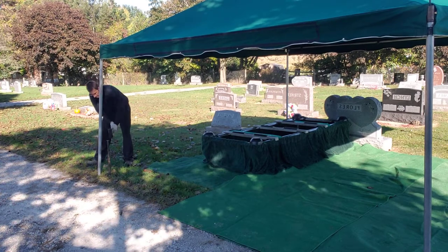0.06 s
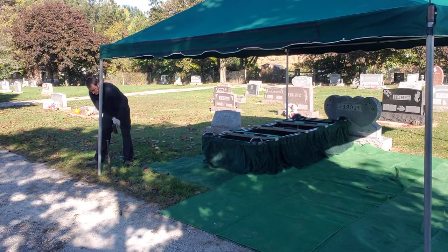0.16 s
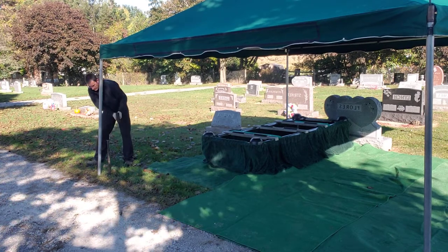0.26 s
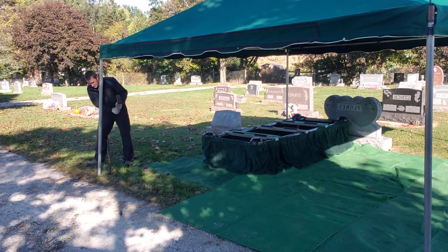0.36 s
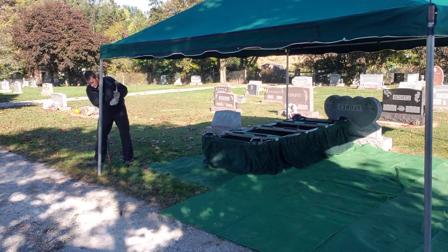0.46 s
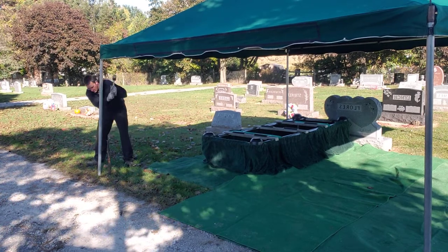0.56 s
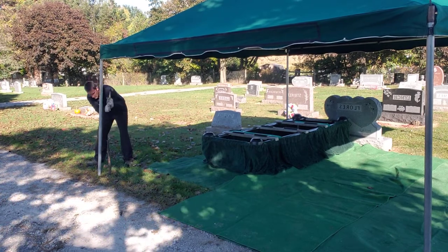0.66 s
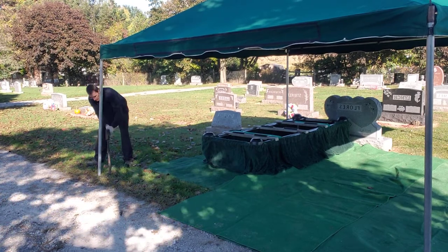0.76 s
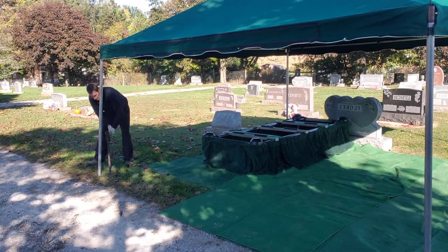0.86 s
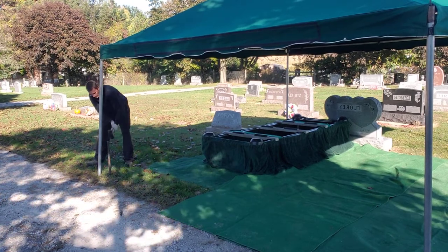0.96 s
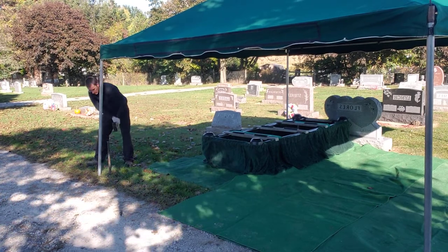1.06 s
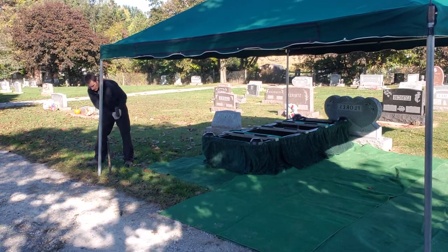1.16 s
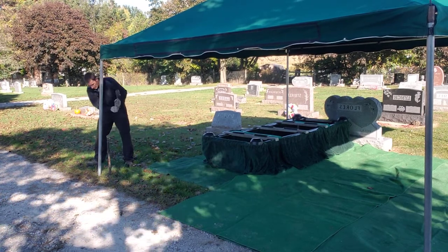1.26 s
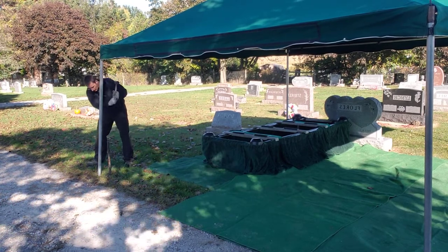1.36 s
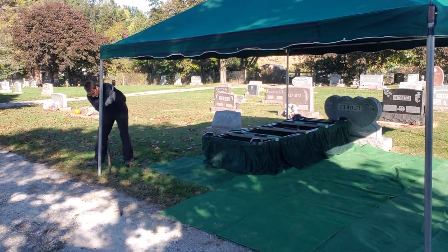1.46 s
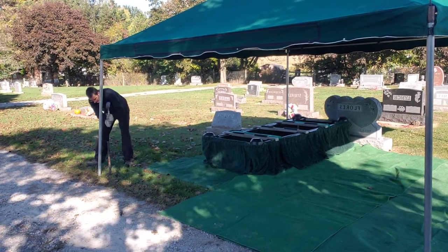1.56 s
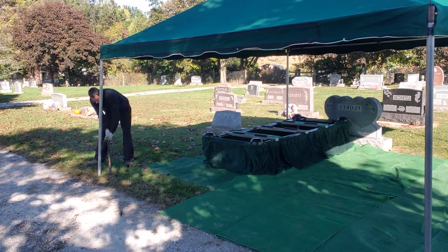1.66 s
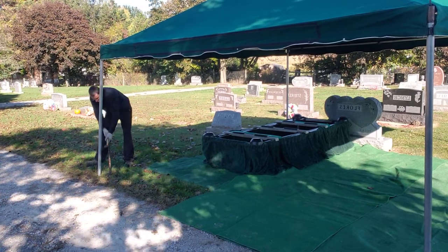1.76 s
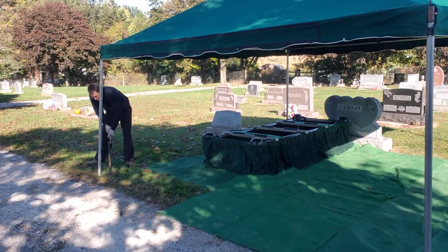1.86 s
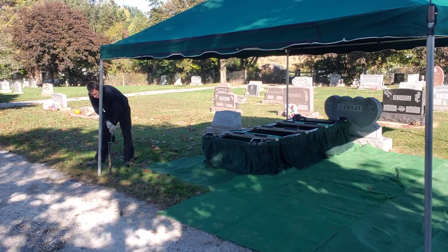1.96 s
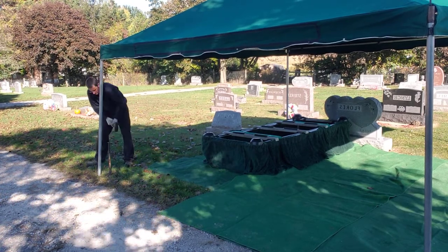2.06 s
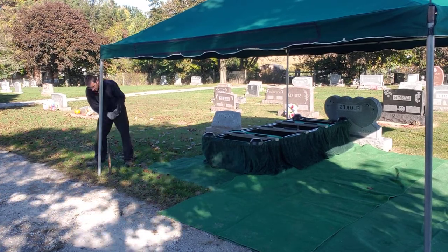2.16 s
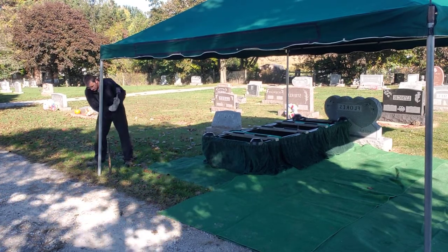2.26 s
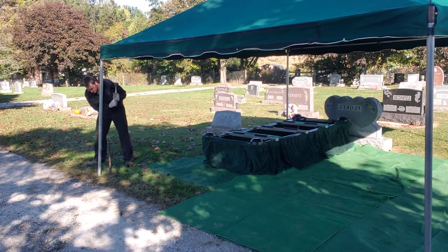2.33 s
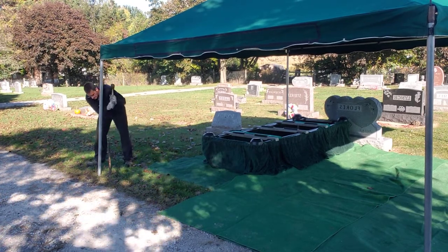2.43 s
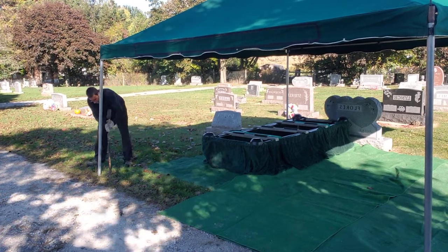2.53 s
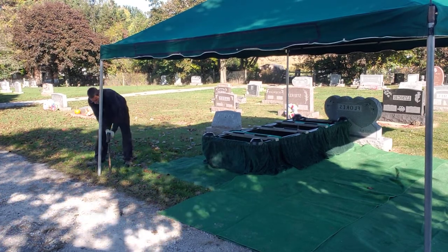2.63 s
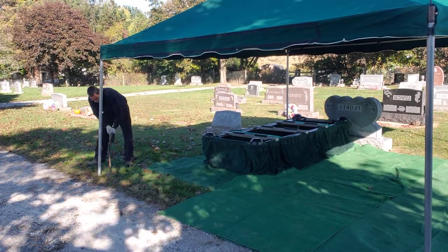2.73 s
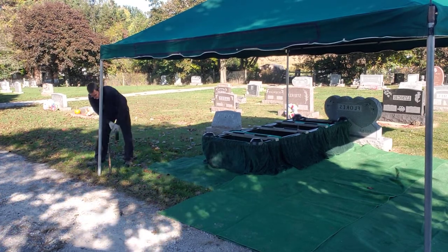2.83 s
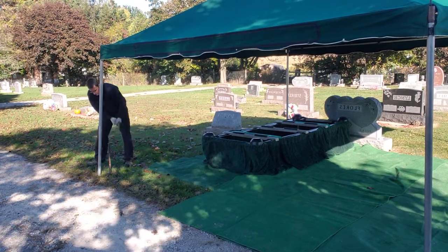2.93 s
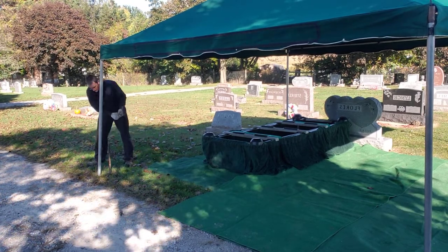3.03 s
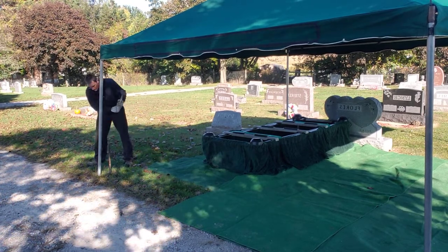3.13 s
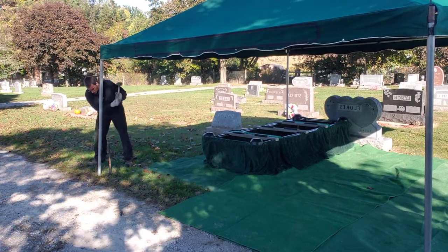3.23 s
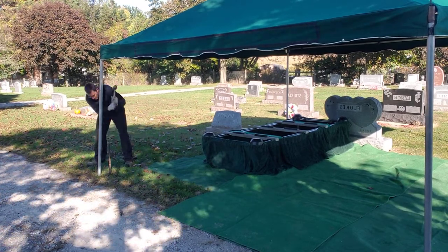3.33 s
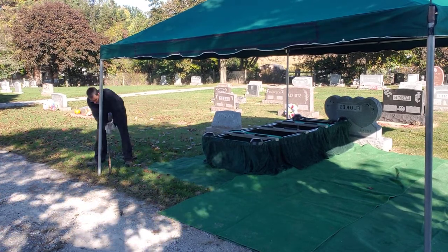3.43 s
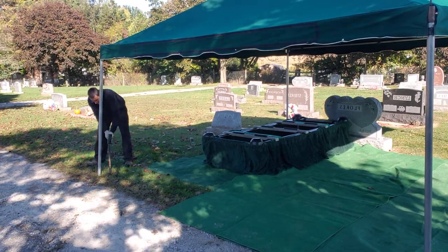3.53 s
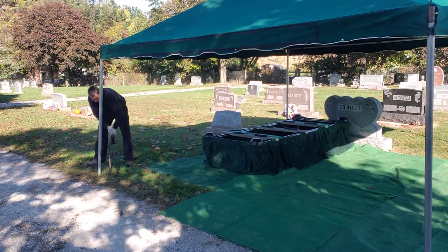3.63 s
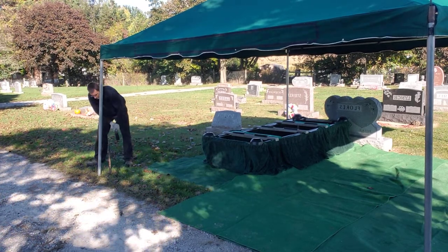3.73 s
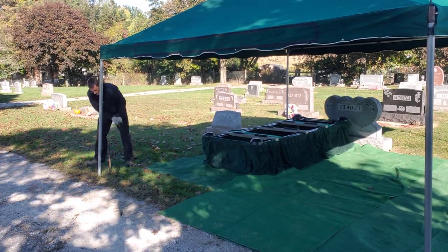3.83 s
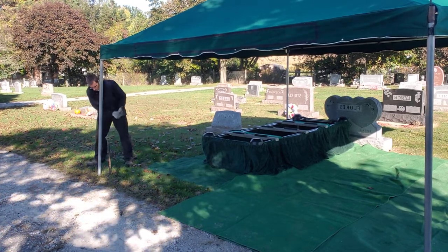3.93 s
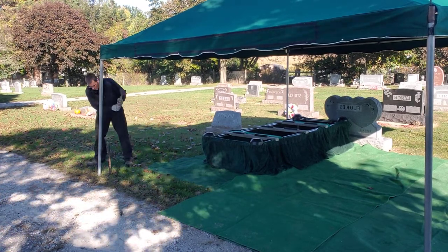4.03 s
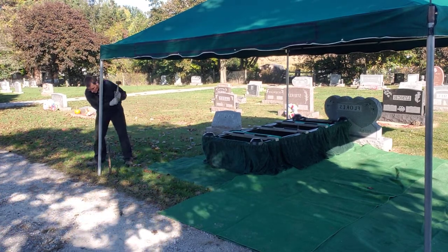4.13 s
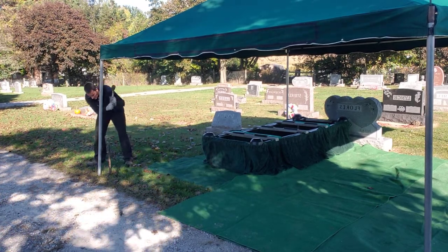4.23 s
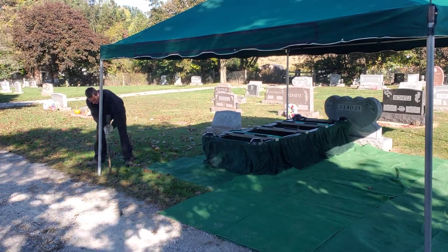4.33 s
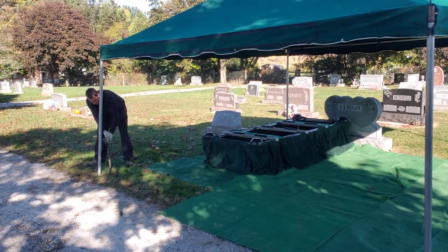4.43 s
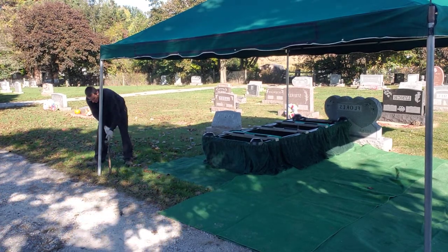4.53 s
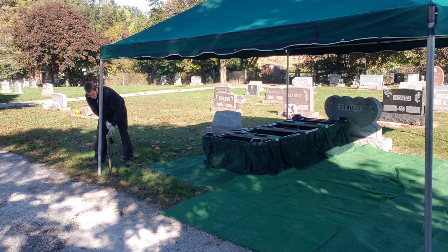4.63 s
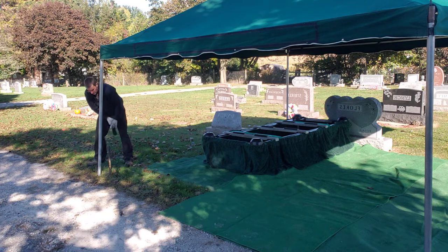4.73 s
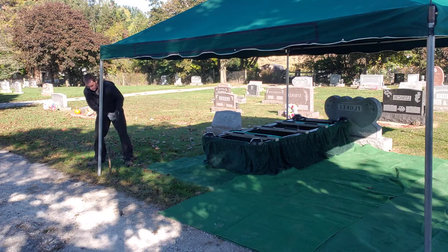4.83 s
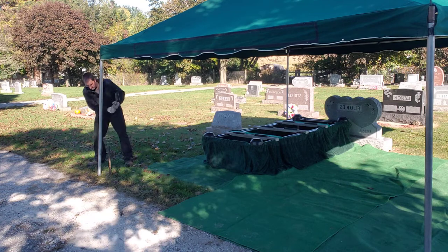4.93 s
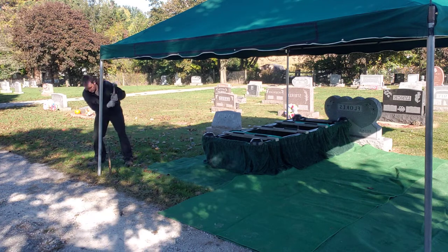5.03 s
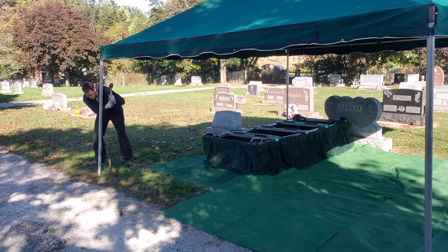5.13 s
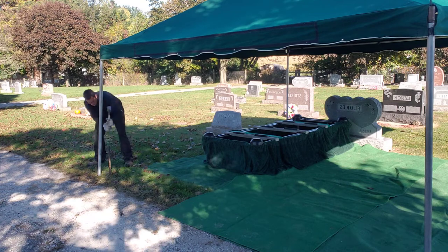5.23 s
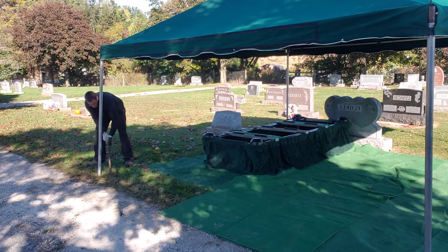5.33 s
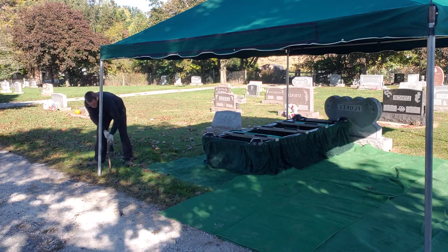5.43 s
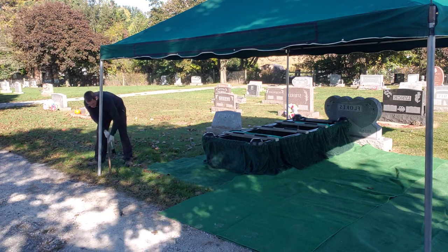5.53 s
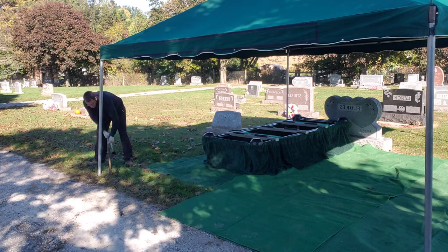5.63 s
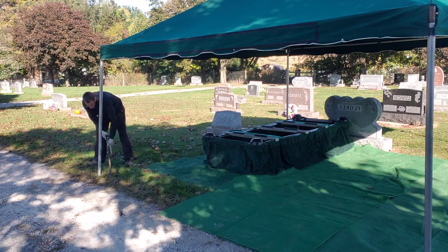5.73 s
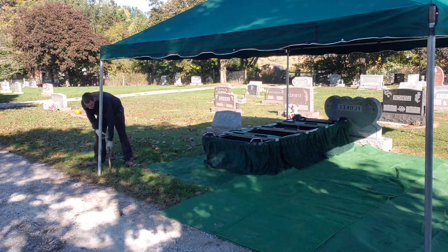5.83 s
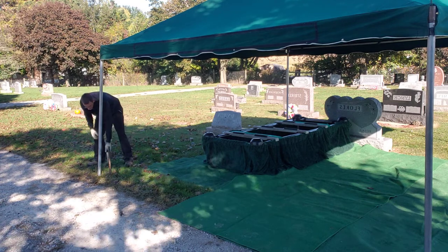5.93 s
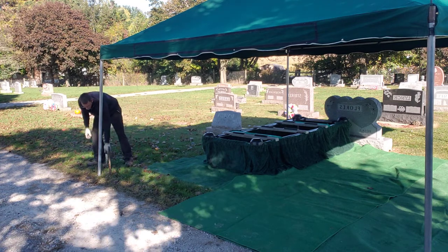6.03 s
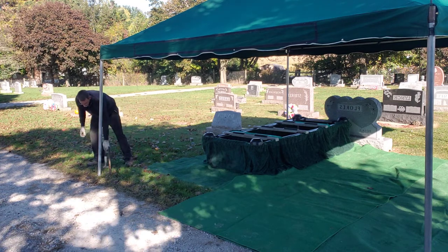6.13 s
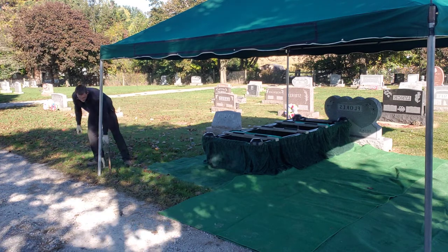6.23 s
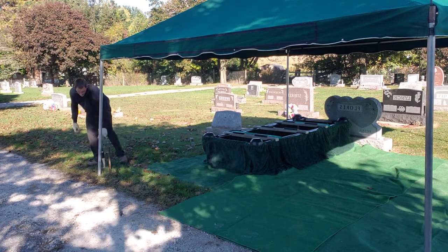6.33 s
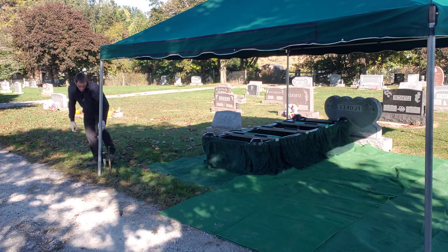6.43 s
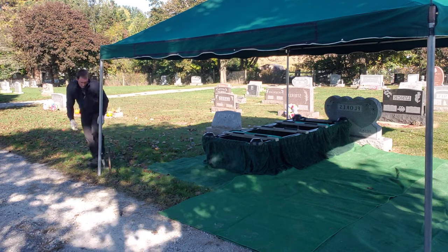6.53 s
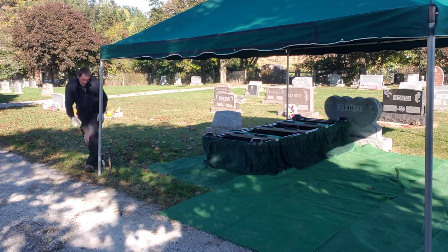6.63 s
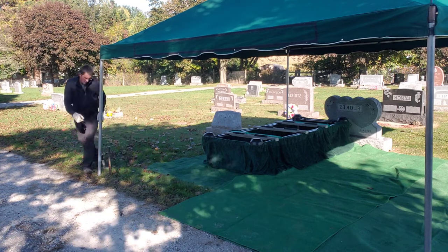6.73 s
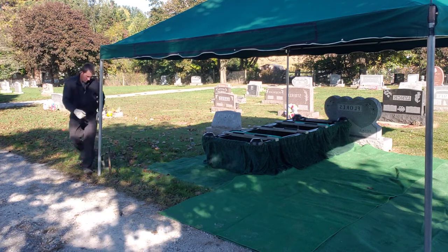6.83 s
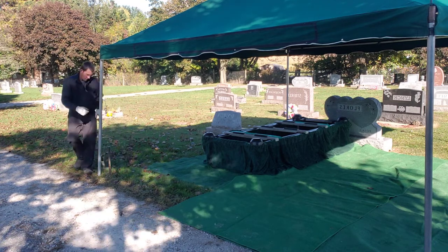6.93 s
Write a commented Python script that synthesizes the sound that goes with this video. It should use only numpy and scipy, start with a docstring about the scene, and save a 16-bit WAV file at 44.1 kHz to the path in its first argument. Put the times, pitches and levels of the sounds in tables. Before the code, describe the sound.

Outdoors on a lawn, a hammer drives a steel stake, heard from some metres away in stereo. A blow is already sounding at 0 s; clean blows follow at about 0.85, 2.65, 3.55, 4.45 and 5.35 s. Each is a sharp bright crack with a high, soil-choked ring, a soft low thud and a dense short echo, stronger on the left, with a faint tail from trees. At 1.7 s a blow glances: a duller clank, a second contact almost at once, and a hollow pole ringing in a falling chirp. Low wind thumps buffet the right side, heaviest in the first second and a half, weaker later. Leaf hiss slowly fades, distant tyres swell faintly near 3.4 and 4.15 s, and a thin wavering machine whine gradually builds. After 6.2 s, a light grass swish and a soft scuff at 6.7 s mark steps away.

```python
"""A hammer blow on a steel stake comes first, already sounding, in a lawn beside a canopy.
Of seven blows six are clean; the third glances off the stake's edge onto a hollow pole.
Each is a noise crack, a dull thud and ringing modes, thrown back by stones and canopy and faintly by trees.
Gusts buffet the two microphone ports, leaves settle as the breeze drops, far tyres roll and a machine whines.
At the end the worker steps away through the grass, heard as short swells of filtered noise."""
import sys
import numpy as np
from scipy import signal
from scipy.fft import rfft, irfft, next_fast_len
from scipy.io import wavfile
from scipy.ndimage import uniform_filter1d

SR = 44100
rng = np.random.default_rng(int(sys.argv[2]) if len(sys.argv) > 2 else 0)


def master(y):
    """Save y as 16-bit WAV."""
    cut = np.clip(np.atleast_2d(y).T, -1, 1)
    pcm = np.round(cut * 32767)  # scale
    wavfile.write(sys.argv[1], SR, pcm.astype(np.int16))


N = 308242
TIME = np.arange(N) / SR  # s
AGE = np.arange(SR) / SR  # time since a contact, s

# Square blows on the stake:
# (time [s], direct level [dB], scattered level [dB], ring over crack [dB], pitch shift [%])
STAKE_BLOWS = [(-.011, -21, -18.5, 0, -0.56), (0.8456, -14, -17, 0.5, 0.016),
               (2.6533, -16.5, -18.5, -0.5, 0.25), (3.5477, -17.5, -20, 2.5, 0.51),
               (4.4435, -13.5, -17.5, 2.5, 0.12), (5.366, -14, -18.5, 2, 0.27)]
# Contacts of the glancing blow:
# (time [s], crack level [dB], scattered level [dB], clank level [dB], clank left minus right [dB])
GLANCING_CONTACTS = [(1.7009, -27.5, -18, -19.5, 20), (1.738, -32, -19, -29, 7)]
# Spectrum of the hammer's crack: (frequency [Hz], density [dB per Hz])
CRACK_SPECTRUM = [(40, 12.5), (110, -34), (400, -18), (800, -5.5), (2400, -9), (4300, -14.5), (7000, -2.5),
                  (10500, -2), (13000, -11.5), (16000, -13)]


def undb(db):
    """Decibels to gain."""
    return 10 ** (np.asarray(db) / 20)


def unit(x, seconds):
    """Scale x so that its energy equals rms 1 held for that long."""
    return x * np.sqrt(seconds * SR / np.sum(x ** 2))


def pan(db):
    """Left and right gains for a level difference, left minus right."""
    return undb(np.array([[db], [-db]]) / 2)


def colour(x, points):
    """Filter by a spectrum of (Hz, dB) points, joined by straight lines over log frequency."""
    hz, db = np.transpose(points)
    size = next_fast_len(x.shape[-1])
    f = np.maximum(np.fft.rfftfreq(size, 1 / SR), 1)
    gain = undb(np.interp(np.log(f), np.log(hz), db))
    return irfft(rfft(x, size) * gain, size)[..., :x.shape[-1]]


def noise(points, size):
    """Noise of rms 1 with a given spectrum."""
    x = colour(rng.standard_normal(size), points)
    return x / x.std()


def walk(rate):
    """Smooth random wander of spread 1, mostly slower than rate in Hz."""
    x = colour(rng.standard_normal(N), [(rate, 0), (2 * rate, -20), (10 * rate, -120)])
    return x / x.std()


def fade(t60, age=AGE):
    """Exponential decay, 60 dB down after t60 seconds."""
    return undb(-60 * np.maximum(age, 0) / t60)


def swell(start, rise, hold, t60):
    """Envelope that builds, holds until start + hold and dies away."""
    return np.clip((TIME - start) / rise, 0, 1) * fade(t60, TIME - start - hold)


def hump(middle, half):
    """Bell-shaped envelope around a time."""
    return np.exp(-((TIME - middle) / half) ** 2)


def burst(rise, length):
    """Envelope of a contact: quick rise, short hold, abrupt end."""
    return (1 - np.exp(-(AGE / rise) ** 2)) * np.exp(-(AGE / length) ** 4)


def ring(modes, shift=0):
    """Decaying sines of a struck body; neighbours start in opposite directions, so the ring takes a moment to build."""
    total = 0
    for k, (hz, db, t60) in enumerate(modes):
        tone = np.sin(2 * np.pi * hz * (1 + shift / 100) * AGE)
        total = total + (-1) ** k * undb(db) * fade(t60) * tone
    return total


def add(out, start, sound):
    """Mix a stereo sound into out at a time in seconds."""
    i = int(round(start * SR))
    a, b = max(i, 0), min(i + sound.shape[1], N)
    out[:, a:b] += sound[:, a - i:b - i]


def echoes(onset, hold, t60, trees_db, trees_t60, lumpy_db):
    """Envelopes of the near reflections, which crowd in and die fast, and of the long faint answer of the trees."""
    lumps = undb(lumpy_db * np.interp(AGE, np.linspace(0, 1, 300), rng.standard_normal(300)))
    rise = 1 - np.exp(-(AGE / onset) ** 4)
    near = fade(t60, AGE - hold)
    far = undb(trees_db) * fade(trees_t60)
    return lumps * rise * np.array([near, far])


def diffuse(envelopes, points):
    """Countless paths, as noise, under the two envelopes; air and foliage dull the far ones."""
    # Colour of the answer from the trees: (frequency [Hz], gain [dB])
    tree_colour = [(100, 3), (600, 2.5), (3600, 3.5), (7000, 3.5), (10000, -14), (15000, -20)]
    near, far = (envelope * noise(points, SR) for envelope in envelopes)
    return near + colour(far, tree_colour)


def scatter(tone, tone_db, right_db=-11, right_tone_db=-2):
    """Crack and ring returned along many paths, strong and late on the left, thin on the right."""
    # Spectra of the returned crack at each port: (frequency [Hz], density [dB per Hz])
    left_spectrum = [(60, -55), (210, -19.5), (380, -15), (750, -2.5), (1400, -4), (2200, 6), (2750, 3.5),
                     (3200, -1.5), (4400, -8), (5600, -13), (6700, -8.5), (11700, -13.5), (14300, -2.5),
                     (15500, -22)]
    right_spectrum = [(40, -12), (110, 3), (450, 1), (800, 0.5), (2400, -0.5), (3200, -3), (4400, -6.5),
                      (7000, -7.5), (10300, 1.5), (11500, -33), (12700, 5.5), (14000, -28), (15000, -29)]
    left = echoes(onset=0.0072, hold=0.025, t60=0.21, trees_db=-14.0, trees_t60=0.57, lumpy_db=-0.4)
    right = echoes(onset=0.0016, hold=0.0074, t60=0.21, trees_db=-21.0, trees_t60=0.66, lumpy_db=4.0)
    settings = (
        (left, left_spectrum, 0, tone_db),
        (right, right_spectrum, right_db, tone_db + right_tone_db),
    )
    sides = []
    for paths, spectrum, db, ring_db in settings:
        crack = unit(diffuse(paths, spectrum), 0.022)
        flat_paths = diffuse(paths, [(1, 0)])
        rung = unit(signal.fftconvolve(flat_paths, tone)[:SR], 0.018)
        sides.append(undb(db) * (crack + undb(ring_db) * rung))
    return np.array(sides)


def hammer(direct_pan_db=-15, direct_ring_db=2, crack_db=0, count=5):
    """Square blows: a crack and the stake's low modes, choked by the soil within milliseconds, then reflections."""
    # Modes of the stake; the soil damps all but one faint lingering mode:
    # (frequency [Hz], level [dB], t60 [s])
    stake_modes = [(3520, -4, .055), (3583, 0, .07), (3660, -.5, .07), (3735, -4.5, .05), (3810, -14, .04),
                   (3625, -27, .6), (5150, -13, .022), (6400, -13, .025), (6860, -10, .03),
                   (7205, -3, .038), (9480, -4.5, .03), (10850, -2.5, .03), (12400, -11, .02),
                   (13500, -3, .038), (14330, -7.5, .018)]
    out = np.zeros((2, N))
    for start, direct_db, scatter_db, ring_db, shift in STAKE_BLOWS:
        crack = burst(rise=.0006, length=.007) * fade(.06) * noise(CRACK_SPECTRUM, SR)
        crack = unit(crack, .002)
        choked = burst(rise=.0005, length=.0065) * fade(.04) * ring(stake_modes[:count], shift)
        choked = unit(choked, .0016)
        direct = undb(crack_db) * crack + undb(ring_db + direct_ring_db) * choked
        # the direct sound favours the right port
        ports = undb(direct_db + np.array([[direct_pan_db], [0]]))
        returned = undb(scatter_db) * scatter(ring(stake_modes, shift), ring_db)
        add(out, start, direct * ports + returned)
    return out


def eddies(points):
    """Noise unrelated between the ports, in quick lumps they share; its slow level is evened out."""
    x = np.array([noise(points, N), noise(points, N)]) * undb(3.2 * walk(16))
    slow_level = np.sqrt(uniform_filter1d(x ** 2, int(.14 * SR)))
    return x / slow_level


def ground(thud_db=-53, rise_s=0.032, t60=0.38, pan_db=-17):
    """Every contact, square or glancing, also sends a dull thud of low noise into the soil."""
    # Spectrum of the thud: (frequency [Hz], density [dB per Hz])
    thud_spectrum = [(25, -26), (65, 1), (110, -6.5), (160, -18.5), (300, -31)]
    thuds = sum(swell(row[0], rise_s, rise_s, t60) for row in STAKE_BLOWS + GLANCING_CONTACTS)
    return eddies(thud_spectrum) * thuds * undb(thud_db) * pan(pan_db)


def wind(low_db=-5.0, low_pan_db=-20, flutter_db=-2.0, flutter_pan_db=-12,
         growth=1.7, strong_db=-30, restless_db=0.5):
    """Wind thumps mostly on the right port; strong gusts add a faster flutter that grows more steeply."""
    # Gusts on the microphone, before the port balance:
    # (start [s], time from start to the dying away [s], t60 of the dying away [s], level [dB])
    gust_times = [(-.04, 0.089, 2.1, -35), (0.326, 0.32, 1.76, -32), (1.12, 0.077, 0.24, -43),
                  (1.988, 0.047, .2, -47.5), (2.103, 0.18, 0.19, -46), (4.188, 0.055, 0.35, -54),
                  (4.932, .08, 3.2, -44.5), (5.817, 0.04, 0.23, -48), (5.999, 0.37, 0.16, -52),
                  (6.543, 0.14, 3, -51)]
    # Spectra of the thumps and of the flutter: (frequency [Hz], density [dB per Hz])
    thump_spectrum = [(20, -31), (35, -5.5), (54, 7.5), (85, 1.5), (110, -6), (160, -28), (260, -36.5),
                      (500, -27.5), (1200, -57)]
    flutter_spectrum = [(50, -23), (110, 4.5), (190, -8), (290, -19.5), (480, -31), (1500, -74)]
    build_share, calm_db = 0.29, -64  # share of its hold that a gust takes to build; stir between gusts
    power = 0
    for start, hold, t60, db in gust_times:
        power = power + (undb(db) * swell(start, build_share * hold, hold, t60)) ** 2
    calm = undb(calm_db + restless_db * walk(18))
    gust_db = 10 * np.log10(power + calm ** 2)
    low = eddies(thump_spectrum) * undb(gust_db + low_db) * pan(low_pan_db)
    fast_db = strong_db + growth * (gust_db - strong_db) + flutter_db
    return low + eddies(flutter_spectrum) * undb(fast_db) * pan(flutter_pan_db)


def outdoors(left_db=-53, right_db=-61, leaves_pan_db=14, leaves_db=-56.0, lull_db_per_s=2.5,
             road_db=-62, recede_db_per_s=1.15, road_pan_db=9):
    """Noise washes of open air, of leaves settling as the breeze drops, and of far tyres that swell and recede."""
    # Spectra of the open air at each port, the leaves and the tyres: (frequency [Hz], density [dB per Hz])
    left_spectrum = [(40, -36), (230, -27.5), (520, -0.5), (1100, -1), (2800, -1.5), (4300, -11),
                     (7000, -16), (10000, -28), (16000, -19.5)]
    right_spectrum = [(30, 9.5), (70, 8.5), (200, 1), (450, -10.5), (620, 4.5), (1200, -13.5), (1900, -29),
                      (3600, -23), (5500, -24.5), (11000, -15), (15000, -39)]
    leaf_spectrum = [(1000, 1), (3000, 5), (5200, -1), (6800, -7), (9500, -3.5), (15500, -2.5)]
    road_spectrum = [(400, -26), (750, -8), (1000, -10), (1400, -8.5), (2500, -47), (5000, -38)]
    # Far tyres swelling: (middle [s], half length [s], level before panning [dB])
    tyre_swells = [(3.4, 0.23, -59), (4.154, 0.22, -59), (6.006, 0.057, -63)]
    air_left = noise(left_spectrum, N) * undb(left_db + .5 * walk(3.1))
    air_right = noise(right_spectrum, N) * undb(right_db + 1.1 * walk(2.9))
    leaves = np.array([noise(leaf_spectrum, N), noise(leaf_spectrum, N)])
    leaves *= undb(leaves_db - lull_db_per_s * TIME + 1.7 * walk(3.6) + 0.25 * walk(36))
    swells = sum(undb(db) * hump(middle, half) for middle, half, db in tyre_swells)
    traffic = np.hypot(undb(road_db - recede_db_per_s * TIME), swells)
    road = np.array([noise(road_spectrum, N), noise(road_spectrum, N)])
    road *= traffic * undb(0.58 * walk(9.4))
    return np.array([air_left, air_right]) + leaves * pan(leaves_pan_db) + road * pan(road_pan_db)


def machine(hz=667, waver=0.01307, flutter_db=2, pan_db=0.0, working_db=-60, starts_s=0.32,
            build_s=3.0, hold_s=3.97, ease_t60=2.2, idle_db=-73):
    """A far sine whine builds, holds and eases back to an idle; pitch and level waver on the way through the air."""
    phase = 2 * np.pi * np.cumsum(hz * (1 + waver * walk(26))) / SR
    working = undb(working_db) * swell(starts_s, build_s, hold_s, ease_t60)
    level = np.hypot(working, undb(idle_db)) * undb(2.4 * walk(4))
    # each port flutters on its own
    ports = [np.sin(phase) * level * undb(flutter_db * np.tanh(walk(39))) for _ in range(2)]
    return np.array(ports) * pan(pan_db)


def glance(clank_echo_db=-10):
    """The hammer skids off the stake's edge with a clank of short modes and lands a second time."""
    # Dull clank of the hammer's edge: (frequency [Hz], level before scaling [dB], t60 [s])
    clank_modes = [(2244, 17.5, 0.0091), (2430, 11, 0.018), (3650, -3, 0.07), (3940, -5.5, 0.077),
                   (6250, -5.5, 0.037)]
    out, tone = np.zeros((2, N)), ring(clank_modes)
    for start, crack_db, scatter_db, clank_db, pan_db in GLANCING_CONTACTS:
        crack = burst(rise=0.00056, length=0.041) * fade(0.068) * noise(CRACK_SPECTRUM, SR)
        crack = unit(crack, 0.025)
        clank = unit(burst(rise=.0008, length=.009) * tone, .006)
        direct = undb(crack_db) * crack * pan(2) + undb(clank_db) * clank * pan(pan_db)
        returned = undb(scatter_db) * scatter(tone, clank_echo_db, right_db=-11.5)
        add(out, start, direct + returned)
    return out


def pole(travel_s=0.029, swell_s=0.0013, direct_db=-4, pan_db=6, echo_db=-4, echo_pan_db=9):
    """Wall waves crawl along the tube near their cut-on, so the ring falls as a chirp, roughened by reflections."""
    # Wall modes of the hollow pole: (frequency [Hz], level before the direct and echo gains [dB], t60 [s])
    wall_modes = [(2135, -33, .22), (2600, -32, .22), (2869, -39, .65), (2908, -33, .6), (2958, -38, .42),
                  (2993, -39, .42), (3103, -29, .38), (3183, -25, .28), (3403, -24, .2), (3545, -29, .22),
                  (3704, -32, .2), (4085, -24, .13), (4335, -29, .12)]
    cuton_hz = 2790
    tube = np.zeros((1, N))
    for hz, db, t60 in wall_modes:
        slowness = 1
        if hz > cuton_hz:
            slowness = 1 / np.sqrt(max(1 - (cuton_hz / hz) ** 2, .03))
        tone = np.sin(2 * np.pi * (hz * AGE + rng.random()))
        mode = (1 - np.exp(-AGE / swell_s)) * fade(t60) * tone
        add(tube, GLANCING_CONTACTS[0][0] + travel_s * slowness, undb(db) * mode[None])
    paths = rng.standard_normal((2, SR)) * fade(.2)
    echo = signal.fftconvolve(tube, paths / np.linalg.norm(paths[0]))[:, :N]
    return undb(direct_db) * tube * pan(pan_db) + undb(echo_db) * echo * pan(echo_pan_db)


def steps(level_db=-4, pan_db=7):
    """Soft steps on the lawn: grass swishes past the shoe and the sole scuffs, both as swelling noise."""
    # Steps, before the overall level and panning:
    # (middle [s], half length [s], swish of the blades [dB], scuff of the sole [dB])
    footfalls = [(6.32, .05, -61.5, -74), (6.733, 0.11, -87, -55)]
    # Spectra of swish and scuff: (frequency [Hz], density [dB per Hz])
    swish_spectrum = [(2000, -14), (5000, -4), (11000, 4), (15500, -5)]
    scuff_spectrum = [(500, -27), (950, 13), (1600, -5), (2400, 3), (3500, -21), (7000, -36)]
    out = np.zeros((2, N))
    for middle, half, swish_db, scuff_db in footfalls:
        for side in range(2):
            swish = undb(swish_db) * noise(swish_spectrum, N)
            scuff = undb(scuff_db) * noise(scuff_spectrum, N)
            out[side] += (swish + scuff) * hump(middle, half)
    return out * undb(level_db) * pan(pan_db)


def scene():
    """All sources together at the microphone."""
    return hammer() + ground() + wind() + outdoors() + machine() + glance() + pole() + steps()


def record(dry):
    """Each port has its own colour and both a deep notch in the treble; the top is cut."""
    # Colour of each port, then of the microphone as a whole: (frequency [Hz], gain [dB])
    left_colour = [(110, -4), (215, -4), (350, 4), (520, 1.5), (760, -1.5), (950, -0.5), (2950, 0),
                   (3250, -1), (3550, 0.5), (5100, 0.5), (5650, -0.5), (6400, 4), (7200, -1)]
    right_colour = [(330, 1), (480, -6.5), (680, 2), (3900, -1), (4500, -2), (5150, 3.5), (5700, 0.5),
                    (6500, -0.5), (9000, 1.5), (11000, 2), (14500, 4)]
    mic_colour = [(7250, -2), (7650, -11.5), (8400, -23.5), (8800, -15.5), (9200, -6.5)]
    top_hz = 15700
    ports = np.array([colour(dry[0], left_colour), colour(dry[1], right_colour)])
    # order 8, 0.2 dB ripple, 70 dB down above the top
    top_cut = signal.ellip(8, .2, 70, top_hz, fs=SR, output="sos")
    return signal.sosfilt(top_cut, colour(ports, mic_colour))


dry = scene()
out = record(dry)
master(out)
```